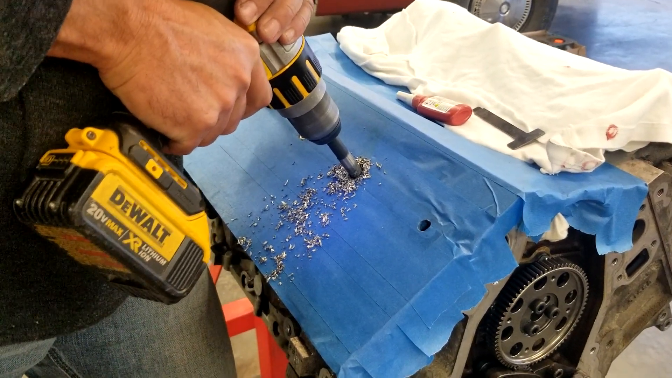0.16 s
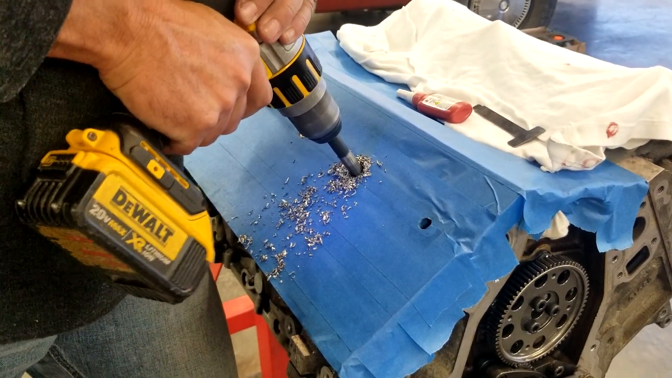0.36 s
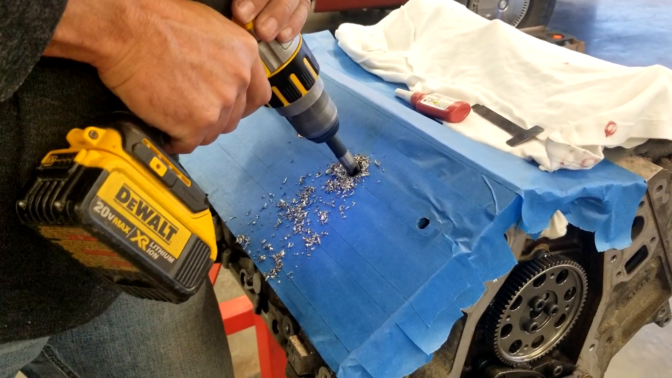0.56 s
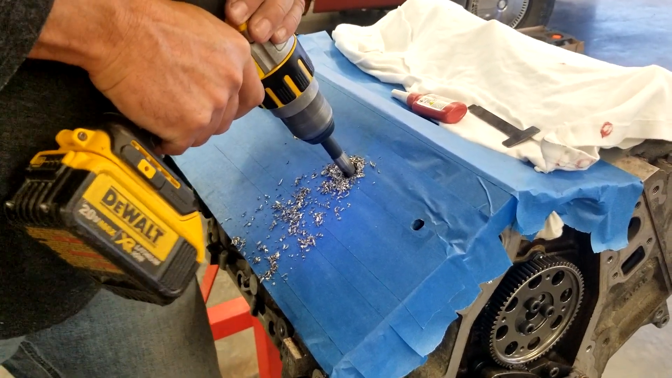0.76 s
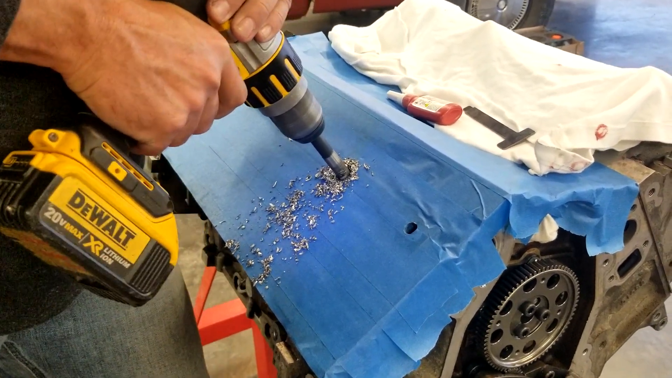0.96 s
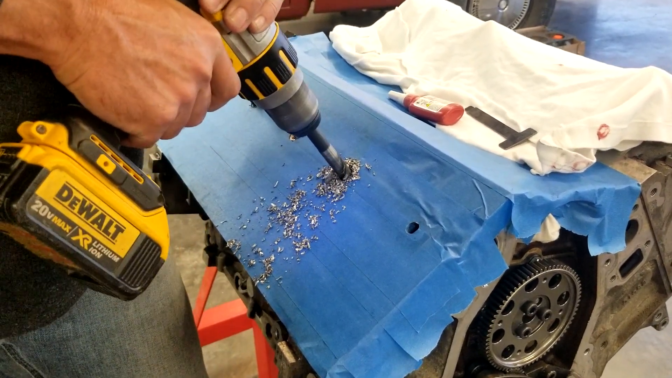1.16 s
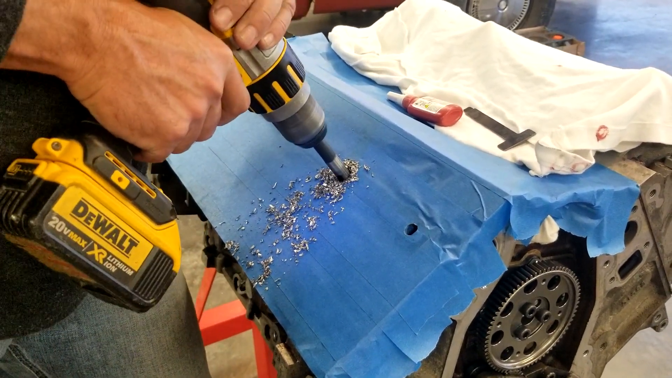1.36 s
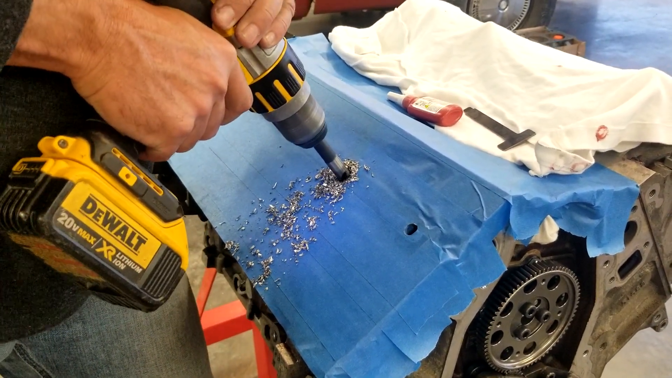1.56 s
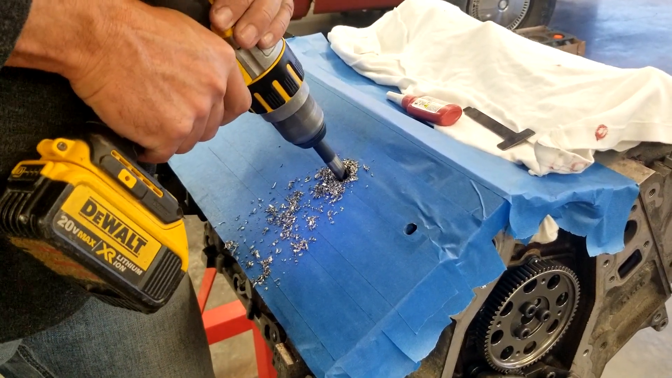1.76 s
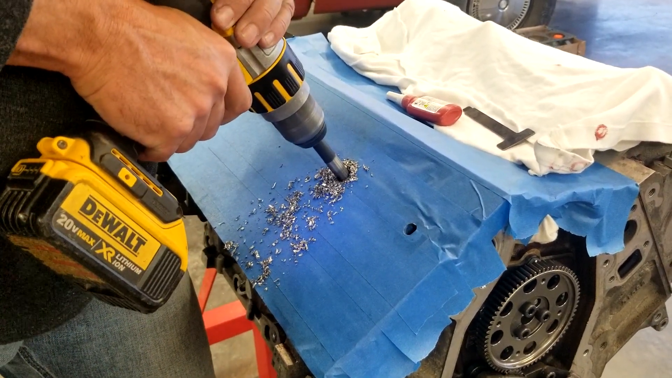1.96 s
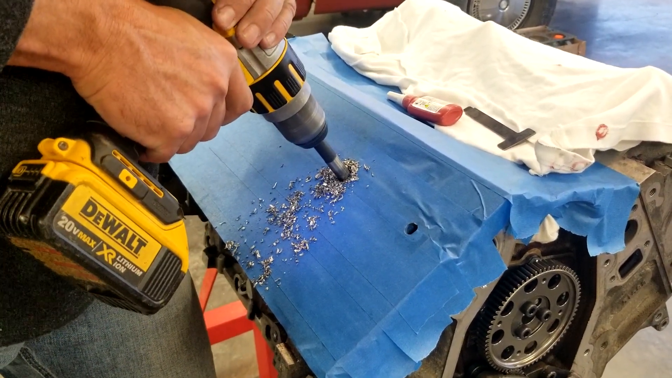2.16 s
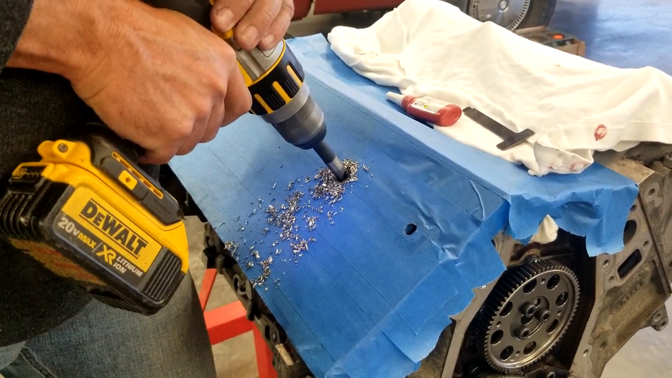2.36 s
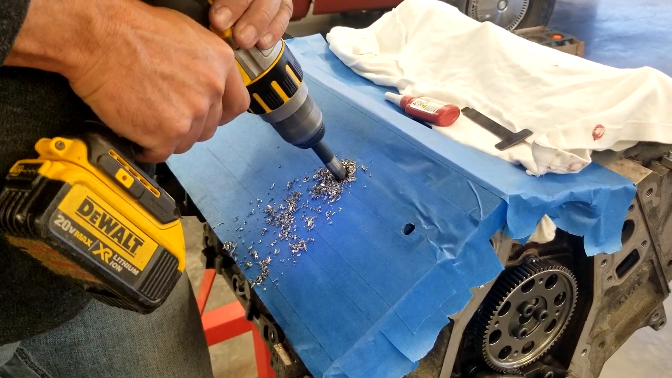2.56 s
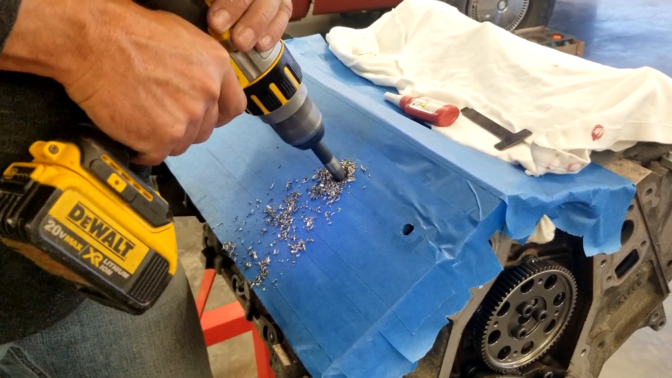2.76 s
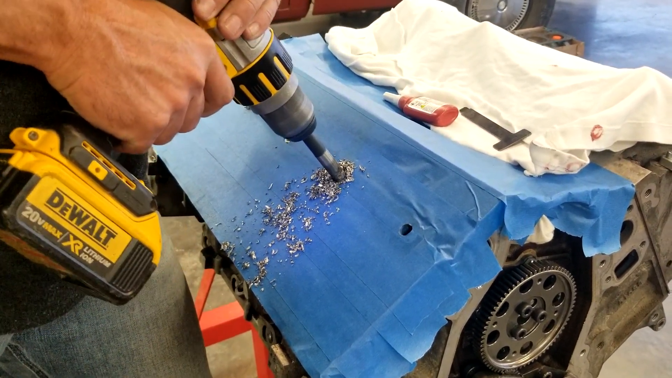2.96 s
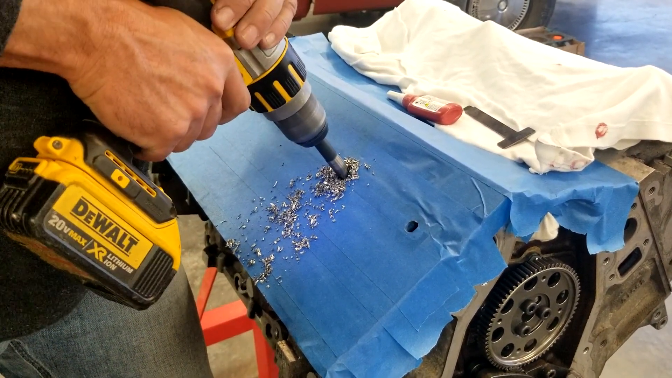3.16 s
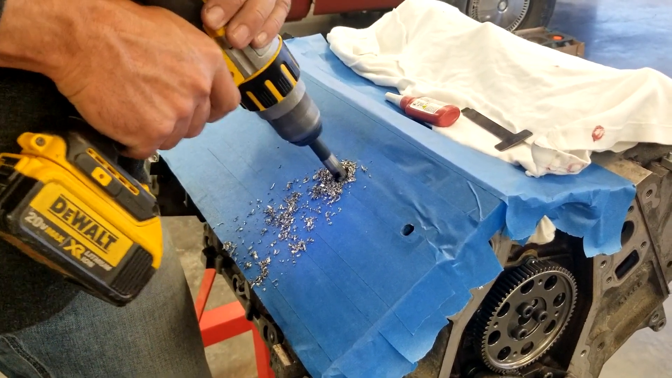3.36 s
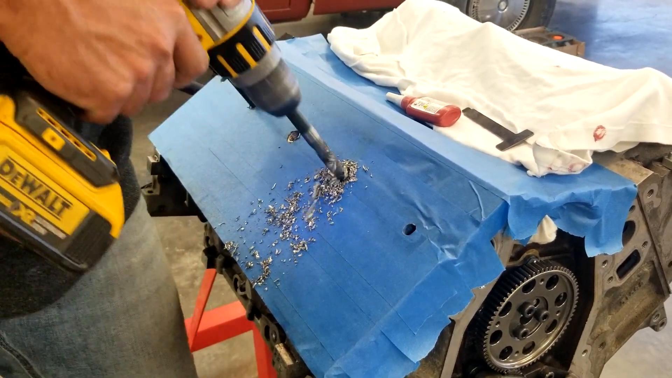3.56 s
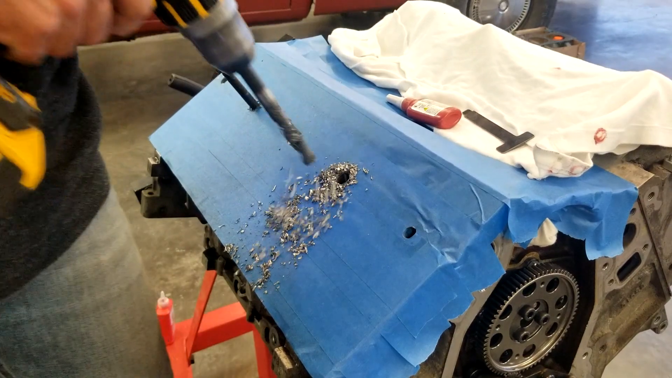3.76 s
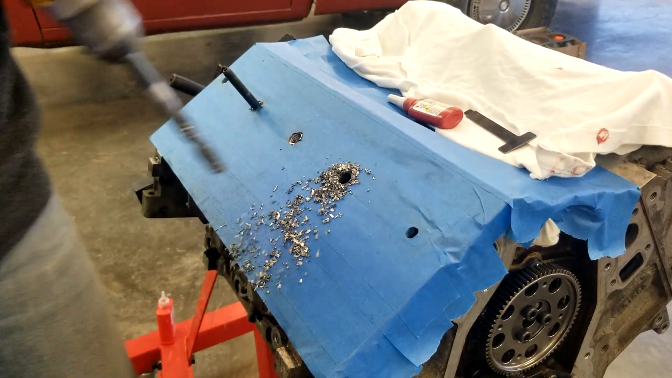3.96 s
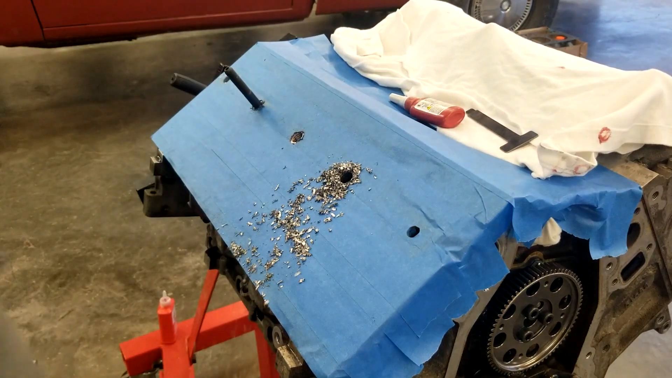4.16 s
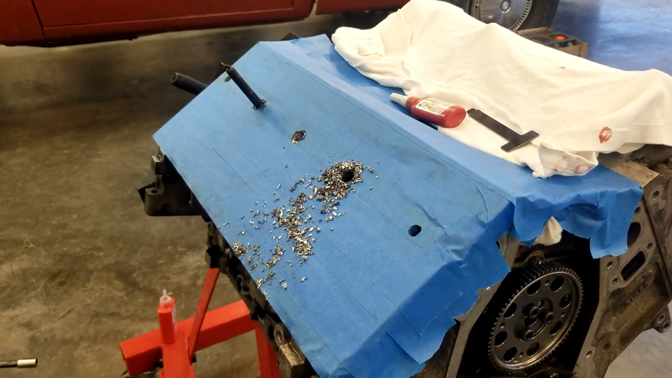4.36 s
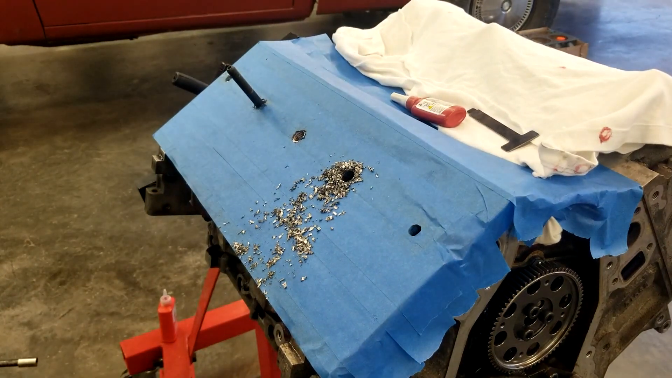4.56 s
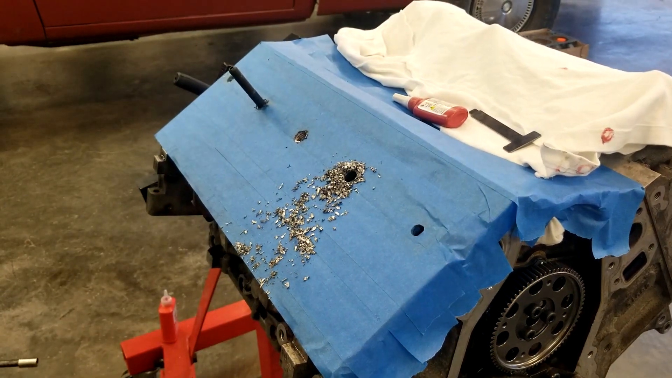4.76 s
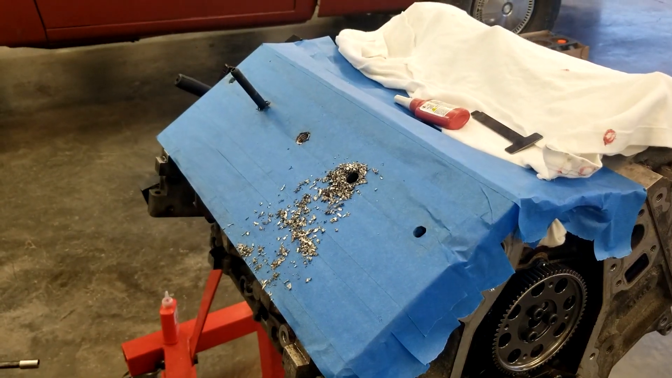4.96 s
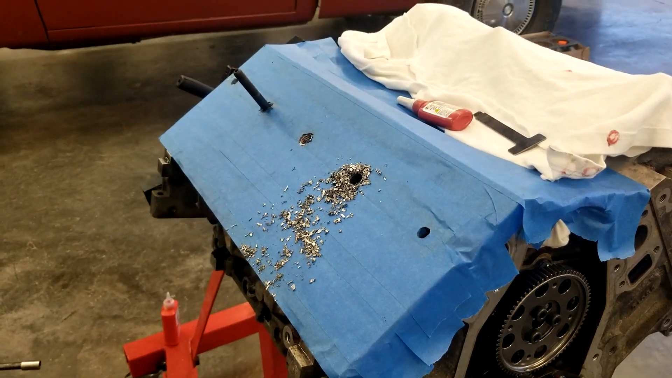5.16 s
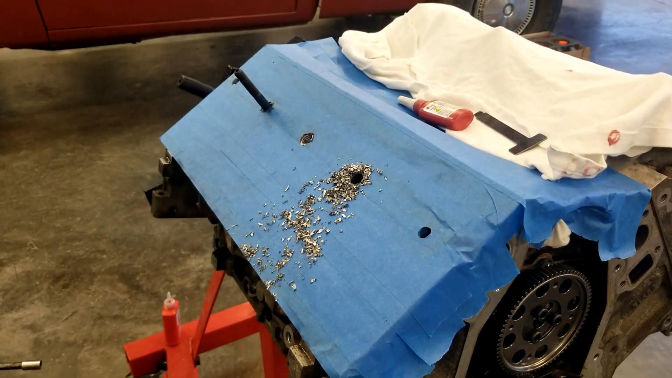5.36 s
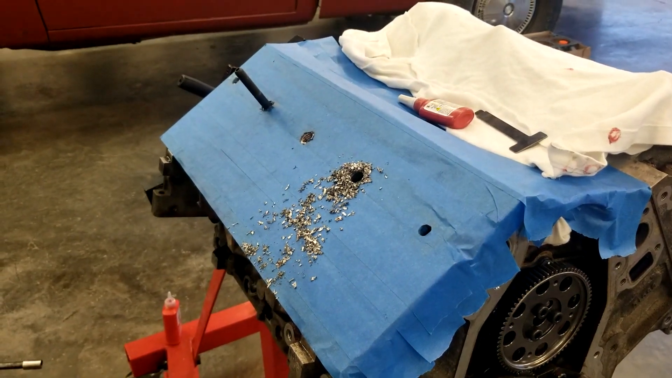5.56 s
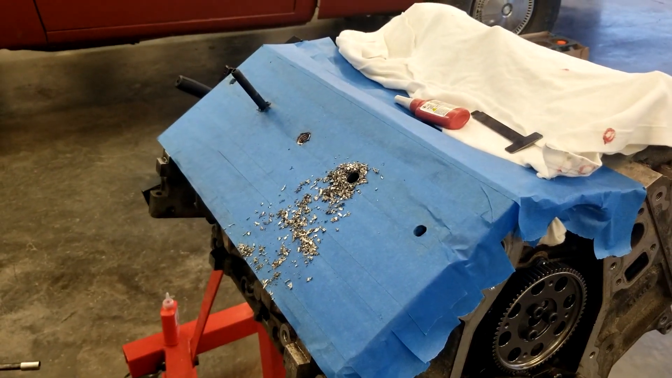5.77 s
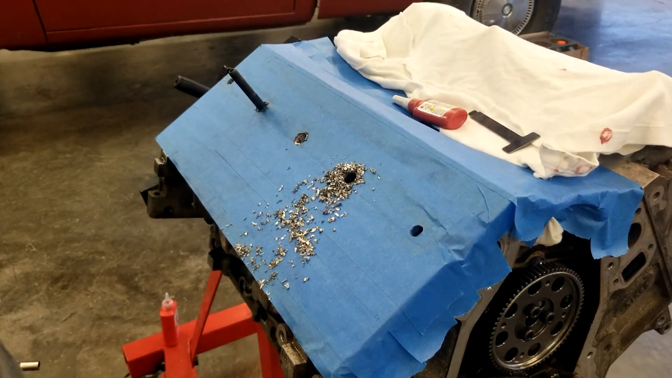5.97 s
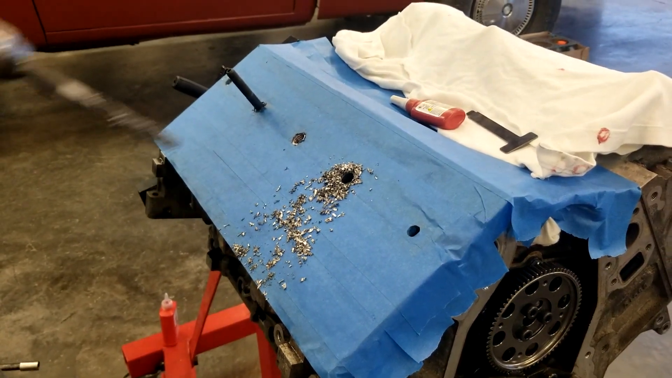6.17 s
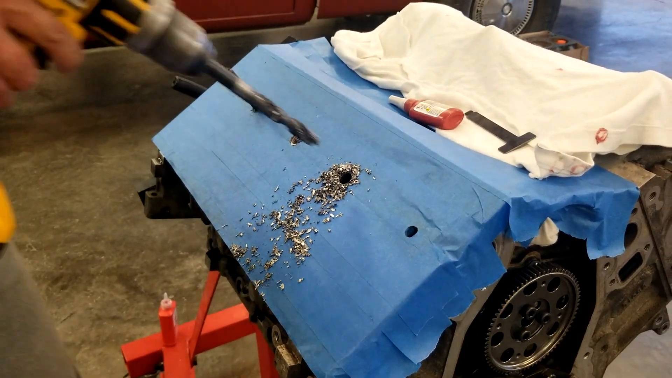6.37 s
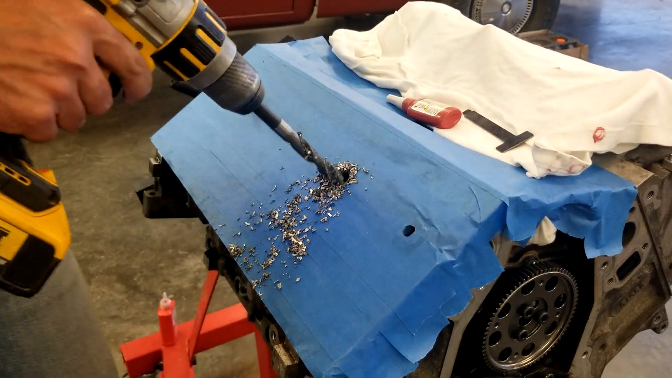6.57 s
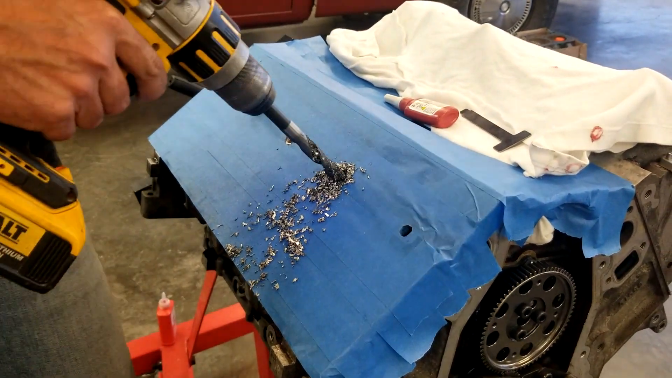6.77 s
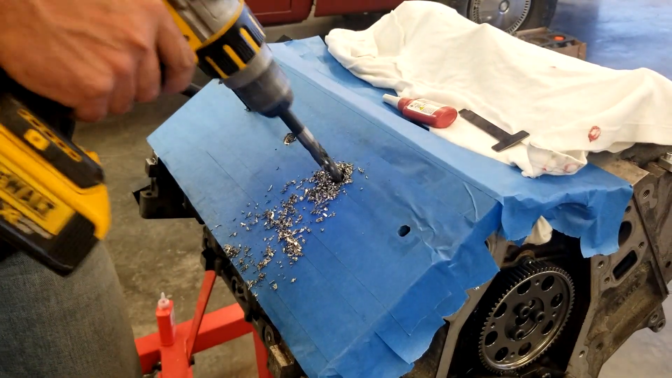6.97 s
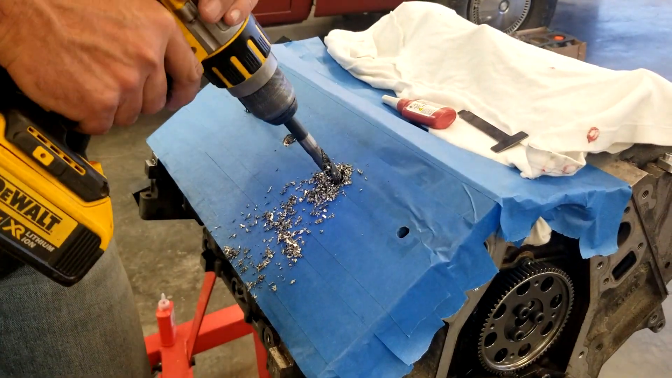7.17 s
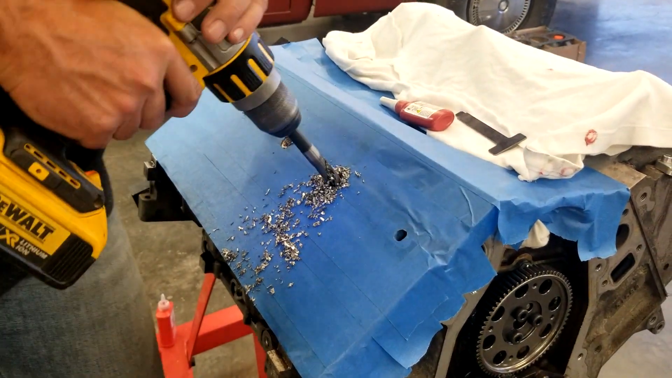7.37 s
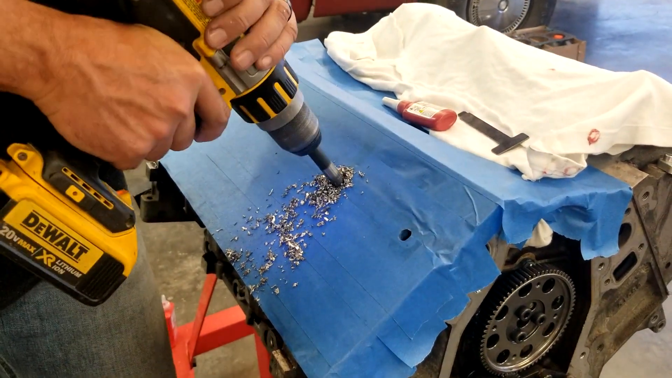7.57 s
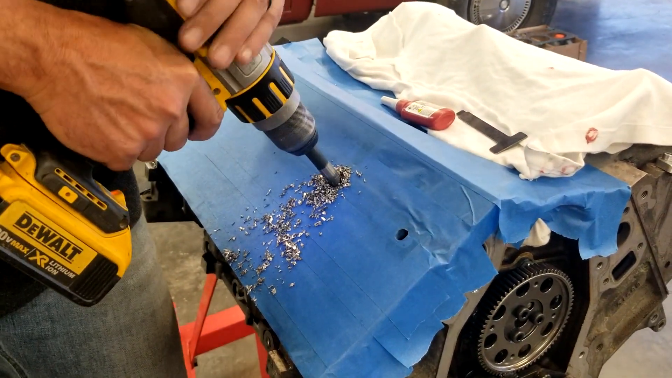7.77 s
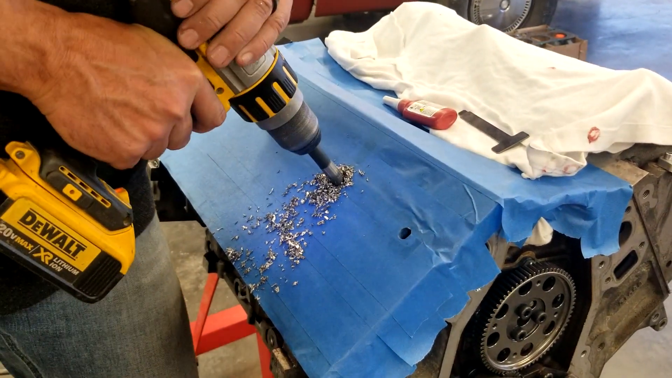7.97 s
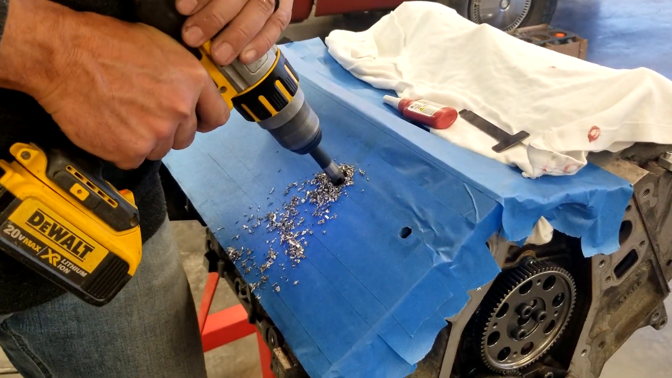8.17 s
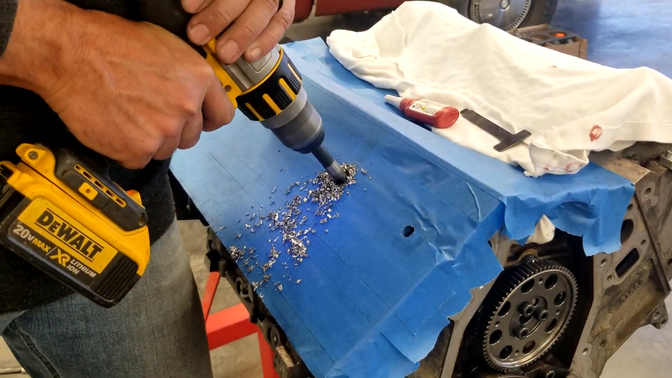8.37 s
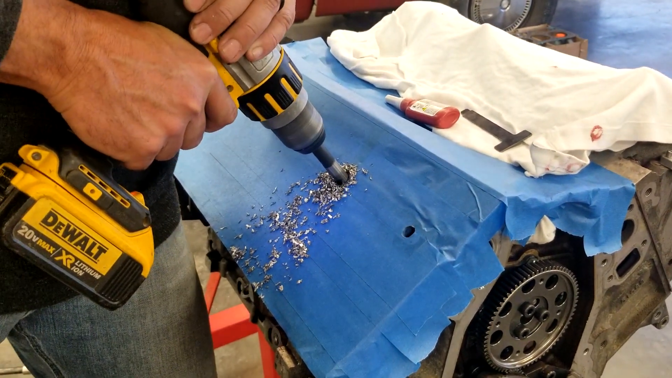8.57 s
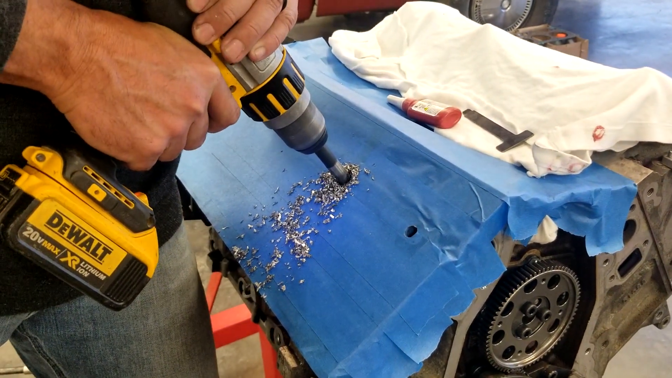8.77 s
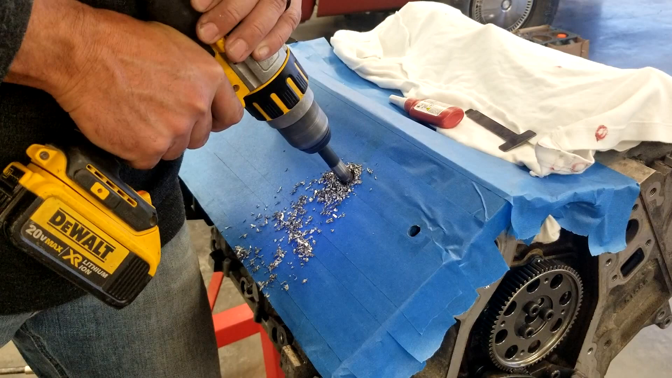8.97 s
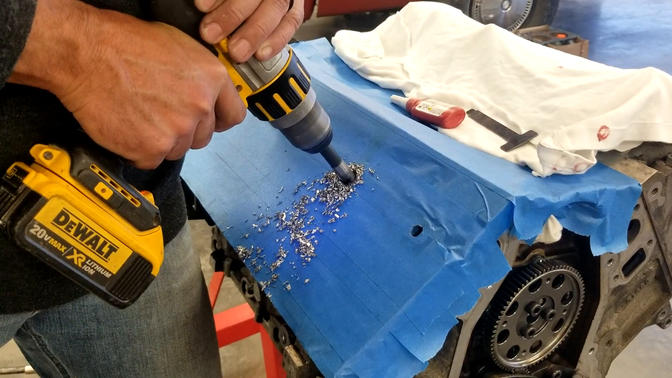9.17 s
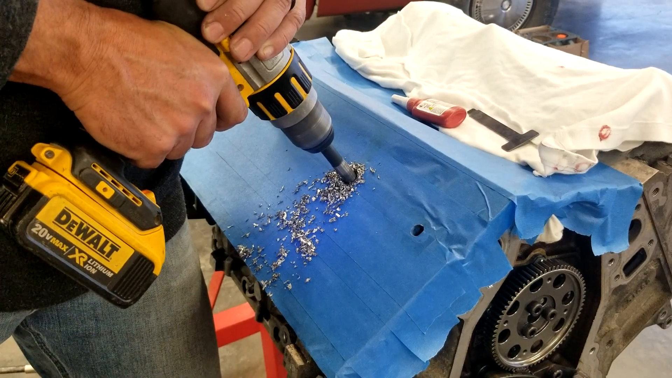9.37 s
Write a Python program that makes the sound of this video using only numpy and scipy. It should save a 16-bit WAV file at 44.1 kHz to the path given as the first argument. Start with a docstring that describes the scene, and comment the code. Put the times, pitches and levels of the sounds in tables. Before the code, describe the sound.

Already running, a cordless drill tears into aluminium close to the microphone, its gear whine growling, rattling and sagging under load. It smooths out, the bit clicks free and the motor winds down. Chips trickle and soft steps fall in a nearly silent garage. Then the bit clatters back into its hole and the drill bites again with a falling, singing squeal. Stereo, close, with a short room tail.

```python
"""A cordless drill is already tearing into an aluminium engine block, close to a camera in a garage.
Its gears whine and sag under load, the flutes squeak, then the bit is pulled out and the motor runs down.
Chips trickle, a few soft steps fall, the bit clatters back into the hole and the drilling starts again.
Tones locked to the motor's turns make the drill; shaped noise makes cut, contacts and steps; a room tail
and a faint rumble surround them at the left and right microphones."""
import sys
import numpy as np
from scipy import signal
from scipy.fft import rfft, irfft, next_fast_len
from scipy.io import wavfile
from scipy.ndimage import uniform_filter1d, map_coordinates

SR = 44100
rng = np.random.default_rng(int(sys.argv[2]) if len(sys.argv) > 2 else 0)


def generate_wav(sig):
    """Save sig (samples, or channels by samples) to the path in sys.argv[1] as 16-bit PCM at SR."""
    pcm = np.round(np.clip(np.atleast_2d(sig).T, -1, 1) * 32767).astype(np.int16)
    wavfile.write(sys.argv[1], SR, pcm)


N = 415845

# Trigger pulls: [pulled t/s, released t/s, rotor hum at top speed level/dB, left minus right/dB]
TRIGGER_PULLS = [(-1, 3.72, -7.5, 0), (7.9, 10, -22, 1)]
# Motor speed with the trigger held, before spin-up, coast and jitter: [t/s, turns per second]
MOTOR_SPEED = [(0, 412), (.2, 452), (.68, 410), (.8, 452), (1.24, 471), (1.52, 362), (1.7, 430),
               (1.95, 467), (2.48, 469), (2.78, 368), (3.03, 370), (3.12, 395), (3.2, 410), (3.46, 423),
               (3.5, 405), (3.56, 424), (3.7, 419), (8.12, 400), (8.2, 405), (8.28, 462), (8.5, 428),
               (8.7, 354), (9.43, 360)]
# Gear tones: [multiple of the motor's turn, free-running level/dB, fully loaded level/dB]
GEAR_TONES = [(1.83, -34, -16), (3, -9.5, -8), (4, -18, -16), (5.5, -20, -13)]
# Relative spectra of the cut, the motor's hiss, a metal contact and a step on concrete: [f/Hz, level/dB per Hz]
CUT_SPECTRUM = [(25, -54), (70, -38), (200, -28), (400, -13.5), (750, -11), (1300, -16.5), (1900, 0),
                (2600, -1.5), (3300, -5), (4000, 1), (6500, -3.5), (8000, -0.5), (9300, -19.5),
                (11400, -5.5), (12000, -16), (13700, -8), (15400, -5)]
HISS_SPECTRUM = [(2500, -23.5), (4000, -9), (5000, -19.5), (6400, -24), (7400, 8.5), (7950, -8),
                 (8600, -31), (9600, -45), (11500, -4.5), (12550, 0), (13700, -11.5), (15200, -2.5)]
KNOCK_SPECTRUM = [(20, -39), (60, -9.5), (130, -13.5), (350, -0.5), (750, -2.5), (1400, 0), (2200, 4),
                  (3000, -3), (4200, 0), (5600, -5.5), (7500, -6.5), (9500, -23), (12500, -13),
                  (15500, -17.5)]
SOLE_SPECTRUM = [(30, -22), (75, 0), (125, -6), (180, 4), (270, -7), (410, 0), (750, -17), (1200, -33),
                 (3000, -50)]
# Gear case resonances that colour the rattle: [f/Hz, width/Hz, level/dB]
HOUSING_MODES = [(1260, 390, 7.5), (1404, 66, -9), (3090, 420, -8.5)]
# Metal contacts of bit, chuck and chips; the last three are relative to the contact:
# [t/s, level/dB, thud/dB, brightness/dB, gear case ring/dB]
CONTACTS = [(3.047, -17, -1, 10, -12), (3.556, -26, 3, -13, -9), (3.877, -26.5, -16, -8, -20),
            (3.884, -20.5, -8, 25, -33), (3.896, -25, -17, 2, -20), (3.914, -23, -7, 9, -34),
            (7.235, -52, 3, -15, 2.5), (4.967, -58, -7, 5.5, -28), (5.078, -63.5, -5, 30, -35),
            (5.971, -47, 8, 44, -32.5), (6.074, -48, 8, -15, -19), (6.218, -39, 10, -3, -40),
            (6.335, -32.5, -5, -0.5, -18), (6.532, -17, -11, -3.5, -14.5), (6.58, -27, 0, -12, -14),
            (6.825, -34, -17, 3, -29), (6.868, -41.5, 5, 2, -12), (6.911, -42, 6, -14, 8),
            (6.957, -19, -8, -9.5, -15.5), (7.272, -34, -2.5, -7, -5), (7.291, -21, 4.5, -11, -18),
            (7.396, -18, -1, -2, -22), (7.429, -19, -10, 9, -17), (7.494, -10.5, 5.5, 9.5, -20.5),
            (7.73, -17, -22, -8, -25), (7.886, -38, -21, 10, -26), (7.963, -11.5, -12, 8.5, -46)]
# Squeaks, before the make-up gain and the microphone gains: [t/s, length/s, f/Hz, level/dB]
SQUEAK_EVENTS = [(3.185, 0.032, 6240, -32.5), (8.539, 0.044, 5900, -26), (8.93, 0.018, 6200, -16.5),
                 (9.042, 0.037, 5720, -28), (9.177, .035, 5860, -30.5), (9.307, 0.03, 5770, -32)]
# Footsteps, before the steps' trim: [t/s, level/dB, t60/s]
FOOTSTEPS = [(4.116, -61, 0.45), (4.648, -48.5, 0.36), (5.955, -61, 0.3), (6.073, -42.5, 0.36)]
# Modes of the free bit: [f/Hz, level/dB]
FREE_BIT_MODES = [(1886, -7), (3871, -5), (4730, 0)]
# Relative spectrum of the still garage: [f/Hz, level/dB per Hz]
QUIET_SPECTRUM = [(20, -38), (36, -18), (58, 0), (82, -8), (150, -18), (260, -31), (1000, -38), (2300, -33),
                  (6700, -42), (9500, -50), (12000, -38.5), (15500, -44)]
# How alike the two microphones hear: [f/Hz, likeness 0 to 1]
LIKENESS = [(60, 0.91), (350, .97), (1300, 0.8), (2400, 0.3), (8000, 0.3)]
# Tilt between the microphones: [f/Hz, left minus right level/dB]
LEFT_TILT = [(1500, 0), (2500, 1), (4000, 0), (7000, 8), (11000, 2), (15500, 8)]
# Decay of the garage: [f/Hz, t60/s]
GARAGE_T60 = [(150, 1), (1500, 0.59), (4000, 0.41), (8000, 0.29)]
# Resonances of the bit in the hole: [f/Hz, width/Hz, lift/dB]
BIT_MODES = [(2370, 290, 4.5), (2960, 350, 6), (5340, 270, 3.5), (6700, 200, 4.5)]
# Longest-lived modes of the block after a knock: [f/Hz, width/Hz, level/dB]
BLOCK_MODES = [(1930, 140, -4), (2260, 290, 2), (4260, 220, -1.5)]
# Level tracks of the two runs, before the offsets below: [t/s, cut level/dB, gear level/dB]
FIRST_RUN_LEVELS = [(0.0, -35, -37.5), (0.62, -35.3, -37.5), (0.8, -40, -40.5), (1.24, -43.5, -43.5),
                    (1.27, -37.5, -39.5), (1.55, -42, -42), (1.81, -35, -38), (2.59, -35, -38.5),
                    (3.02, -39.5, -39.5), (3.06, -34.5, -39), (3.12, -37, -43), (3.19, -38, -38),
                    (3.24, -42, -40), (3.57, -44, -38), (3.68, -49, -43.5), (3.78, -52, -38.5)]
SECOND_RUN_LEVELS = [(7.9, -47.5, -53), (7.99, -47, -43.5), (8.144, -39.5, -41.5), (8.198, -31, -39.5),
                     (8.5, -31.5, -41.5), (8.678, -35, -39.5), (9.38, -36, -39.5)]
# The flutes catch as the bit is worked up and down the hole: [t/s, length/s, level/dB]
SHOVE_EVENTS = [(2.815, 0.02, -50), (3.47, 0.019, -44.5), (6.912, 0.057, -40.5), (7.29, 0.012, -42),
                (7.397, 0.0065, -32.5), (7.42, 0.035, -39), (7.497, 0.0034, -21)]
# Loose chips are stirred: [t/s, length/s, level/dB]
RUSTLE_EVENTS = [(4.12, 0.23, -59), (5.85, 0.45, -71.5), (6.66, 0.28, -70.5)]
# Relative spectrum of the loose chips: [f/Hz, level/dB per Hz]
RUSTLE_SPECTRUM = [(300, -36), (2200, 4), (7000, 2), (9500, -8), (11500, 7.5), (15500, -4.5)]
# The withdrawn bit rings as chips leave it: [t/s, length/s, level/dB]
FREE_RING_EVENTS = [(4.15, 0.15, -78), (4.36, 0.15, -73)]
# How hard the flutes chatter in the hole: [t/s, chatter 0 smooth to 1 violent]
CHATTER_TRACK = [(0, 1), (.7, .95), (.8, .55), (1.23, .38), (1.29, .95), (1.55, .85), (1.8, 1), (2.6, 1),
                 (2.95, .5), (3.13, .85), (3.2, .15), (3.7, 0), (7.95, .8), (8.2, .7), (8.55, .72),
                 (8.75, .95)]
# Case resonances that swell a passing gear tone: [f/Hz, width/Hz, lift/dB]
CASE_MODES = [(780, 130, 7), (1320, 330, 11), (2330, 200, 11), (2850, 400, 6)]
# Gear case modes when jolted: [f/Hz, width/Hz, level/dB]
CLUNK_MODES = [(1215, 290, 1), (1373, 45, 5)]
# The bit grabs and the gears growl: [t/s, length/s, level/dB, upper sideband relative level/dB]
GROWL_EVENTS = [(0, .25, -38.5, -3), (.36, .17, -37.5, 0), (.61, .11, -38, -5), (1.28, .06, -38, -7),
                (1.4, .28, -44, -9), (1.74, .04, -36.5, -10), (8.2, .35, -34, -10)]
# The bit sings, lower as it digs in: [t/s, f/Hz, level/dB]
SING_TRACK = [(8.13, 2950, -62), (8.21, 2900, -36.5), (8.32, 2800, -35.5), (8.41, 2590, -39.5),
              (8.51, 2360, -36), (8.63, 2200, -43), (8.76, 2050, -60)]

IDLE_DB, FULL_LOAD_DB = -47, -31  # cut level that counts as no load and as full load
CUT_DB = 6  # offset of the tearing metal from the cut level
RATTLE_FREE_DB, RATTLE_LOADED_DB = -9.5, -3  # offsets from the gear level: smooth, violent chatter
WHINE_FREE_DB, WHINE_LOADED_DB = 0, -4  # likewise for the whine, which gives way to rattle
HISS_IDLE_DB, HISS_LOADED_DB = -37.5, -31.5  # the motor hisses more as it works harder
SHOVE_RISE_DB_PER_S, SHOVE_FALL_DB_PER_S = 998.5, 717
GRAZE_DB, GRAZE_RISE_DB_PER_S = -15, 208.5  # the bit grazes the rim before each shove
RUSTLE_RISE_DB_PER_S, RUSTLE_FALL_DB_PER_S, FREE_RING_FALL_DB_PER_S = 98, 55, 92
SPIN_UP_S, COAST_S = .009, .48  # spin-up time constant; time to coast to rest
COAST_DB_PER_S, BRAKE_AFTER_S, BRAKE_T60_S = 22, .155, .13  # level fades in the coast, faster once braked
CHUCK_TURNS = 14  # motor turns to one turn of the chuck
CRACK_T60_S, BODY_DB = .011, -14  # the crack of a contact, and the body beside it
RING_T60_S, CLUNK_T60_S = .22, .17  # ringing of the block and of the gear case
GROWL_RISE_DB_PER_S, GROWL_FALL_DB_PER_S = 260, 85
BUCK_TURNS, BUCK_DB = 16, 4.5  # motor turns per buck of a grabbing bit; depth of that pulsing
DRONE_DB = -27  # the low judder under the growl
FLOOR_DB = -69
TOP_HZ = 15950  # upper band limit of the camera
SIDES = np.array([[.5], [-.5]])  # half of a difference to each microphone: left, right
RIGHT = np.array([[0], [1]])  # selects the right microphone


def amp(db):
    """Decibels to gain."""
    return 10 ** (np.asarray(db) / 20)


def unit(x):
    """Scale to rms 1."""
    return x / np.sqrt(np.mean(x ** 2) + 1e-20)


def along(points, hz):
    """Read (f/Hz, value) points on a log frequency axis."""
    f, v = np.transpose(points)
    return np.interp(np.log(hz + 1), np.log(f + 1), v)


def curves(rows):
    """One value per sample for each column after the time."""
    s, *cols = np.transpose(rows)
    return [np.interp(np.arange(N) / SR, s, c) for c in cols]


def between(free, loaded, load):
    """A value that goes from free to loaded as the load goes from 0 to 1."""
    return free + (loaded - free) * load


def wobble(rate):
    """A smooth random curve with rate knots a second."""
    knots = rng.standard_normal(int(N * rate / SR) + 4)
    return map_coordinates(knots, [np.arange(N) * rate / SR])


def noise(size):
    """Unrelated white noise for two microphones."""
    return rng.standard_normal((2, size))


def filtered(x, response):
    """Apply a complex response of frequency to x."""
    n = x.shape[-1]
    m = next_fast_len(n + 8192)
    return irfft(rfft(x, m) * response(np.fft.rfftfreq(m, 1 / SR)), m)[..., :n]


def coloured(x, spectrum):
    """Shape x by a spectrum, at rms 1."""
    return unit(filtered(x, lambda hz: amp(along(spectrum, hz))))


def lift_db(modes, hz):
    """Summed resonance peaks in dB at a frequency."""
    return sum(db / (1 + (2 * (hz - c) / w) ** 2) for c, w, db in modes)


def resonant(x, modes):
    """Pass x through band-pass resonances with steepened skirts, at rms 1."""
    def response(f):
        return sum(amp(db) * (1j * f * w / (c * c - f * f + 1j * f * w)) ** 1.5 for c, w, db in modes)
    return unit(filtered(x, response))


def microphones(pair, lead_ms=.13):
    """Make two signals left and right: most alike in the bass, left earlier and brighter; mid rms 1."""
    def blend(hz):
        turn = np.arccos(np.clip(along(LIKENESS, hz), 0, 1)) / 2
        return np.array([np.cos(turn), np.sin(turn)])

    def placing(hz):
        lead = np.exp(2j * np.pi * SIDES * hz * lead_ms / 1000)
        return amp(SIDES * along(LEFT_TILT, hz)) * lead

    mid, side = filtered(pair, blend)
    both = filtered(np.array([mid + side, mid - side]), placing)
    return both / both.mean(0).std()


def add(track, s, sound):
    """Mix a sound into a track at time s."""
    part = track[..., round(s * SR):][..., :sound.shape[-1]]
    part += sound[..., :part.shape[-1]]


def swells(rows, rise_db_per_s, fall_db_per_s):
    """Gain of (t/s, length/s, level/dB) events: each rises to its level, holds it and dies away."""
    t = np.arange(N) / SR
    total = 0
    for s, length, db in rows:
        rise = rise_db_per_s * np.maximum(s - t, 0)
        fall = fall_db_per_s * np.maximum(t - s - length, 0)
        total = total + amp(db - rise - fall)
    return total


def fractures(rate, spread_db):
    """Random tiny snaps, rate a second, some much stronger; each is a brief noise burst per microphone."""
    strength = amp(spread_db * np.minimum(rng.exponential(size=N), 4))
    snaps = (rng.random(N) < rate / SR) * strength
    energy = signal.lfilter([1], [1, -np.exp(-1 / (0.00043 * SR))], snaps ** 2)  # 0.43 ms decay
    return unit(np.sqrt(energy) * noise(N))


def patchy(x, depth_db):
    """Each chip favours other frequencies: short time-frequency patches of random gain."""
    z = signal.stft(x, nperseg=512)[2]
    field = rng.standard_normal(z.shape[1:])
    field = uniform_filter1d(uniform_filter1d(field, 4, 0), 7, 1)
    return unit(signal.istft(z * amp(depth_db * unit(field)), nperseg=512)[1][:, :N])


def trigger(pulled, released):
    """Share of full speed and gain for one pull: quick spin-up, steady coast, then a braked fade."""
    t = np.arange(N) / SR
    spin_up = 1 - np.exp(-np.maximum(t - pulled, 0) / SPIN_UP_S)
    spin = spin_up * np.clip(1 - (t - released) / COAST_S, 0, 1)
    coast_db = -COAST_DB_PER_S * np.maximum(t - released, 0)
    brake_db = -60 * np.maximum(t - released - BRAKE_AFTER_S, 0) / BRAKE_T60_S
    return spin, spin_up ** 4 * amp(coast_db + brake_db)


def drill(hum_grows=3):
    """Motor turns time the moving parts and the depth of cut loads them; speed sags as the table says."""
    spins, gains = np.swapaxes([trigger(pulled, released) for pulled, released, _, _ in TRIGGER_PULLS], 0, 1)
    cut_db, gear_db = curves(FIRST_RUN_LEVELS + SECOND_RUN_LEVELS)
    load = np.clip((cut_db - IDLE_DB) / (FULL_LOAD_DB - IDLE_DB), 0, 1)
    chatter, = curves(CHATTER_TRACK)
    tug = 1 + (.0025 + .022 * chatter ** 2) * wobble(30)  # the bites tug at the speed
    speed = curves(MOTOR_SPEED)[0] * spins.sum(0) * tug
    turns = np.cumsum(speed) / SR
    hum = sum(amp(db) * spin for (_, _, db, _), spin in zip(TRIGGER_PULLS, spins))
    hum = hum * (speed / speed.max()) ** hum_grows
    placed = sum(gain * amp(left_db * SIDES) for (_, _, _, left_db), gain in zip(TRIGGER_PULLS, gains))
    gear_sound = rattle(turns, chatter, gear_db) + whine(speed, turns, load, chatter, gear_db, hum)
    return placed * (cutting(turns, cut_db) + gear_sound + growl(turns) + sing() + hiss(load))


def cutting(turns, level_db):
    """Two flutes tear chips off the wall; the tearing pulses with the turns of the geared-down chuck."""
    chuck = 2 * np.pi * turns / CHUCK_TURNS
    bite_db = 1.1 * np.sin(chuck) + 0.31 * np.sin(2 * chuck + wobble(6.1))
    bite_db += 0.77 * wobble(25) + 0.21 * wobble(220)
    tearing = patchy(noise(N) + 0.46 * fractures(rate=1100, spread_db=1.0), depth_db=1.5)
    ringing = filtered(tearing, lambda hz: amp(lift_db(BIT_MODES, hz)))
    return amp(level_db + CUT_DB + bite_db) * microphones(coloured(ringing, CUT_SPECTRUM))


def rattle(turns, chatter, gear_db, spread_db=1.5):
    """Gears knock through their backlash four times a chuck turn, unevenly, and ring the gear case."""
    mesh = amp(1.8 * np.sin(2 * np.pi * 3 * turns) + 2.3 * wobble(160) + 1.2 * wobble(45))
    bites = np.floor(4 * turns / CHUCK_TURNS + .22 * wobble(90))
    strength = amp(spread_db * np.clip(rng.standard_normal(N), -2, 2))
    knocks = np.abs(np.diff(bites, prepend=bites[0])) * strength * rng.choice([-1, 1], (2, N))
    share = .45  # of the driving power is in the knocks
    drive = np.sqrt(1 - share) * unit(mesh * noise(N)) + np.sqrt(share) * unit(knocks)
    level_db = gear_db + between(RATTLE_FREE_DB, RATTLE_LOADED_DB, chatter)
    return amp(level_db) * microphones(resonant(drive, HOUSING_MODES))


def whine(speed, turns, load, chatter, gear_db, hum):
    """Rotor hum and gear tones follow the shaft; chatter shakes and pulses them, load shifts their levels."""
    shake = .1 + 1.1 * chatter
    chuck = 2 * np.pi * turns / CHUCK_TURNS
    bite_db = 4.5 * chatter * np.sin(2 * chuck + wobble(20))
    pulse = amp(bite_db + 2 * chatter * wobble(55) - 1.5 * chatter)
    twist = 1.1 * chatter ** 2 * np.sin(4 * chuck + 1.5 * wobble(25))  # the bit winds up and lets go

    def tone(k):
        phase = 2 * np.pi * k * turns + twist + shake * wobble(110)
        return np.sqrt(2) * np.sin(phase) * amp(2 * shake * wobble(120))

    gears = 0
    for k, free, loaded in GEAR_TONES:
        tone_db = between(free, loaded, load ** 3) + lift_db(CASE_MODES, k * speed)
        gears = gears + amp(tone_db) * tone(k)
    rotor = hum * amp(2.5 * wobble(25)) * np.sin(2 * np.pi * turns + 1.3 * shake * wobble(40))
    level_db = gear_db + between(WHINE_FREE_DB, WHINE_LOADED_DB, chatter)
    tones = amp(level_db) * (pulse * gears + rotor)
    # the right microphone trails by up to one radian
    return filtered(tones, lambda hz: np.exp(-1j * np.minimum(hz / 1300, 1) * RIGHT))


def growl(turns, waver=1.15, rough_db=2.5):
    """As the bit grabs, the main gear tone swells and wavers over a low judder; backlash adds a sideband."""
    buck_db = BUCK_DB * np.sin(2 * np.pi * turns / BUCK_TURNS + wobble(16))
    buck = unit(amp(buck_db + 1.5 * wobble(22) + rough_db * wobble(200)))

    def tone(k):
        return np.exp(1j * (2 * np.pi * k * turns + waver * wobble(60) + .6 * wobble(260)))

    main = tone(3) + amp(DRONE_DB) * tone(6 / CHUCK_TURNS)
    upper = tone(3 + 6 / CHUCK_TURNS)
    voice = 0
    for s, length, db, side_db in GROWL_EVENTS:
        swell = swells([(s, length, db)], GROWL_RISE_DB_PER_S, GROWL_FALL_DB_PER_S)
        voice = voice + swell * (main + amp(side_db) * upper)
    return np.sqrt(2) * np.real(buck * voice * np.exp(-1.3j * RIGHT))  # the right trails by 1.3 radians


def hiss(load):
    """Fan and bearings hiss as patchy shaped noise, louder under load."""
    level_db = between(HISS_IDLE_DB, HISS_LOADED_DB, load) + 0.46 * wobble(60)
    return amp(level_db) * microphones(coloured(patchy(noise(N), depth_db=2.0), HISS_SPECTRUM))


def garage(x, size=22050):
    """The room's answer: each frequency dies at its own rate; the echo pattern is redrawn each half second."""
    out = np.zeros((2, N))
    for start in range(0, N, size):
        hz, t, z = signal.stft(noise(SR * 3 // 4), SR, nperseg=256)
        decay = amp(-60 * t / along(GARAGE_T60, hz)[:, None])
        tail = signal.istft(z * decay, SR, nperseg=256)[1]
        tail *= 1 - np.exp(-np.arange(tail.shape[1]) / SR / 0.011)  # soft onset
        tail /= np.linalg.norm(tail[0])
        add(out, start / SR, signal.fftconvolve(x[:, start:start + size], tail, axes=1))
    return out


def still_garage():
    """The faint rumble of the place: shaped noise whose level drifts slowly."""
    return amp(FLOOR_DB + wobble(0.67)) * microphones(coloured(noise(N), QUIET_SPECTRUM))


def slide():
    """The flutes catch and scrape on the rim: snaps and noise under a fast shove and a slower graze."""
    catches = fractures(rate=300, spread_db=3.5) + 1.3 * noise(N)
    shove = swells(SHOVE_EVENTS, SHOVE_RISE_DB_PER_S, SHOVE_FALL_DB_PER_S)
    graze = amp(GRAZE_DB) * swells(SHOVE_EVENTS, GRAZE_RISE_DB_PER_S, SHOVE_FALL_DB_PER_S)
    return np.maximum(shove, graze) * microphones(coloured(catches, KNOCK_SPECTRUM))


def taps(body_t60=0.077, attack=0.001, ring_db=-26):
    """Steel on aluminium: a hard crack and a quickly damped body, while block and gear case ring on."""
    out, t = np.zeros((2, N)), np.arange(SR // 3) / SR
    jiggle = amp(3 * wobble(180))  # the loose chuck rattles after each contact
    crack, body = amp(-60 * t / CRACK_T60_S), amp(BODY_DB - 60 * t / body_t60)
    for s, db, thud_db, bright_db, clunk_db in CONTACTS:
        contact = [(430, thud_db), (850, -3.5), (1400, -2), (3000, -1.5), (7000, bright_db)]  # (f/Hz, dB)
        decay = crack + body * jiggle[round(s * SR):][:len(t)]
        decay = decay * (1 - np.exp(-t / attack))
        knock = decay * microphones(coloured(coloured(noise(len(t)), KNOCK_SPECTRUM), contact))
        ring = amp(ring_db - 60 * t / RING_T60_S) * microphones(resonant(noise(len(t)), BLOCK_MODES))
        clunk = amp(clunk_db - 60 * t / CLUNK_T60_S) * microphones(resonant(noise(len(t)), CLUNK_MODES))
        add(out, s, amp(db) * (knock + ring + clunk))
    return out


def squeaks(fall=0.086, rough=0.047):
    """A flute sticks and slips: a short, falling squeal with rough pitch."""
    out = np.zeros((2, N))
    for s, length, hz, db in SQUEAK_EVENTS:
        u = np.linspace(0, 1, int(length * SR))
        roughness = unit(uniform_filter1d(noise(len(u)), 20))
        pitch = hz * (1 + fall * (.5 - u) + rough * roughness)
        squeal = np.sin(np.pi * u) * np.sin(2 * np.pi * np.cumsum(pitch, 1) / SR)
        add(out, s, amp(db + 3.5) * squeal)
    return out * amp([[4], [-1]])  # left and right gain in dB


def steps(heel_db=2, attack=0.0012):
    """Soft soles thud on the concrete: a short heel strike, then the foot settles."""
    out, t = np.zeros((2, N)), np.arange(SR // 2) / SR
    for s, db, t60 in FOOTSTEPS:
        settle = amp(-60 * np.maximum(t - .025, 0) / t60)
        heel = amp(heel_db - 60 * t / 0.021)
        weight = (settle + heel) * (1 - np.exp(-t / attack))
        add(out, s, amp(db - 1.0) * weight * microphones(coloured(noise(len(t)), SOLE_SPECTRUM)))
    return out


def trickle():
    """Loose chips rustle and tick; just after it leaves the hole the free bit rings faintly with them."""
    grains = amp(3.8 * wobble(45)) * (fractures(rate=420, spread_db=2) + .7 * noise(N))
    rustle = microphones(coloured(grains, RUSTLE_SPECTRUM))
    stir = swells(RUSTLE_EVENTS, RUSTLE_RISE_DB_PER_S, RUSTLE_FALL_DB_PER_S)
    ring = swells(FREE_RING_EVENTS, RUSTLE_RISE_DB_PER_S, FREE_RING_FALL_DB_PER_S)
    t = np.arange(N) / SR
    modes = 0
    for hz, db in FREE_BIT_MODES:
        phase = 2 * np.pi * hz * t + .8 * wobble(50) + .5 * wobble(300)
        modes = modes + amp(db + 2 * wobble(70)) * np.sin(phase)
    return stir * rustle + ring * np.sqrt(2) * modes


def sing():
    """Under the hardest push the flutes drive one narrow, rough resonance of the bit, which glides down."""
    hz, db = curves(SING_TRACK)
    t = np.arange(N) / SR

    def rough():
        return wobble(190) + 1j * wobble(190)

    swing = 1.4 + rough() + np.array([rough(), rough()])  # shared roughness, then each microphone's own
    tone = unit(np.real(swing * np.exp(2j * np.pi * np.cumsum(hz) / SR)))
    sounding = (t > SING_TRACK[0][0]) * (t < SING_TRACK[-1][0])
    return sounding * amp(db) * tone


def scene():
    """Drill, handling and steps close to the camera, with the garage's answer and its faint rumble."""
    tool = drill() + squeaks()
    handling = taps() + slide() + trickle()
    feet = steps()
    room = garage(amp(-13.0) * tool + amp(-13.0) * handling + amp(-19.5) * feet)
    return tool + handling + feet + room + still_garage()


def record(dry):
    """The camera's steep upper band limit."""
    return filtered(dry, lambda hz: 1 / np.hypot(1, (hz / TOP_HZ) ** 120))


dry = scene()
out = record(dry)
generate_wav(out)
```